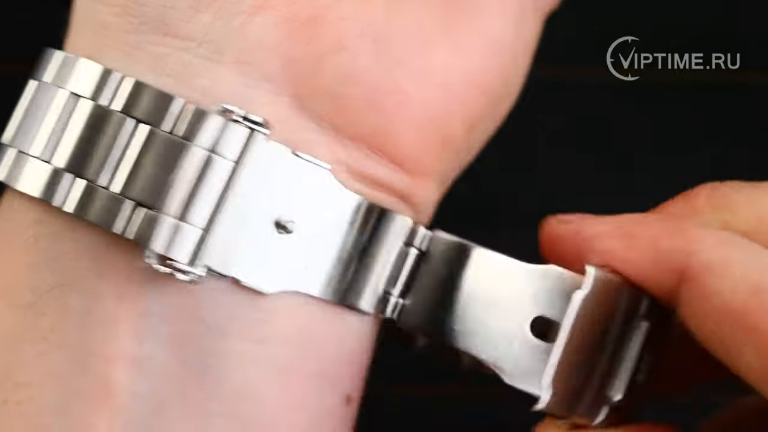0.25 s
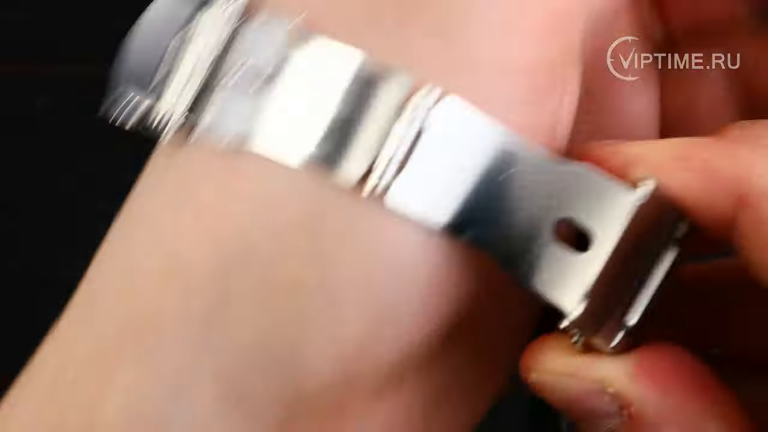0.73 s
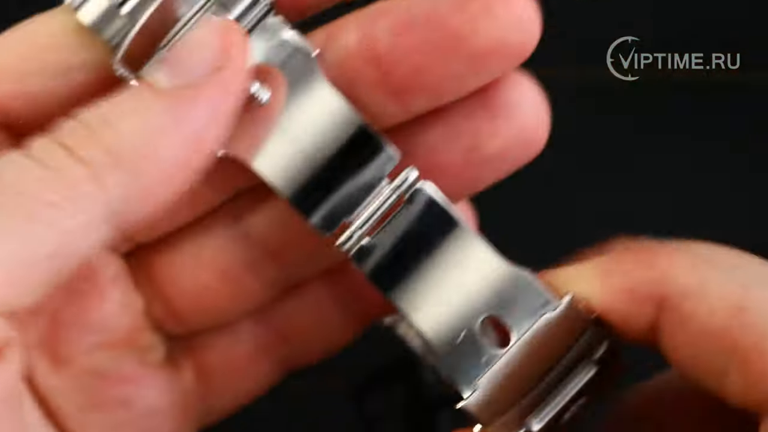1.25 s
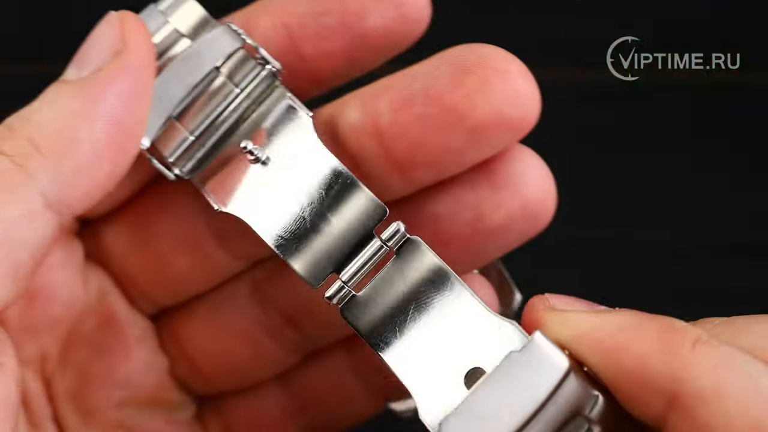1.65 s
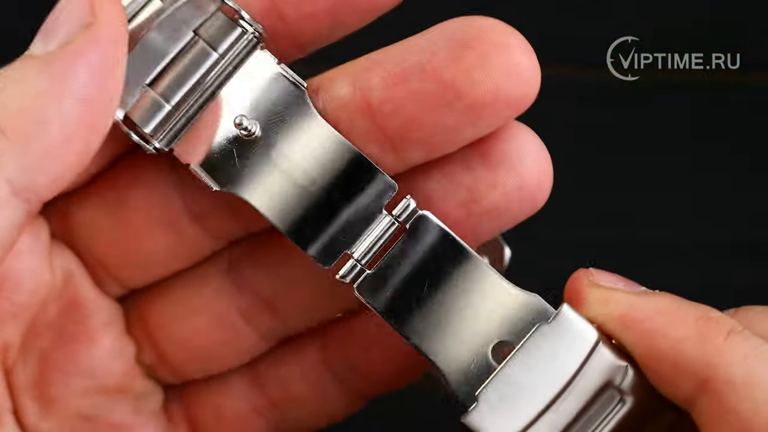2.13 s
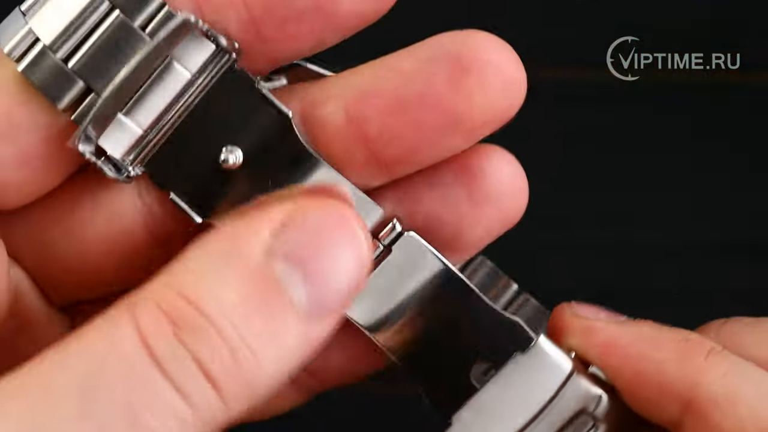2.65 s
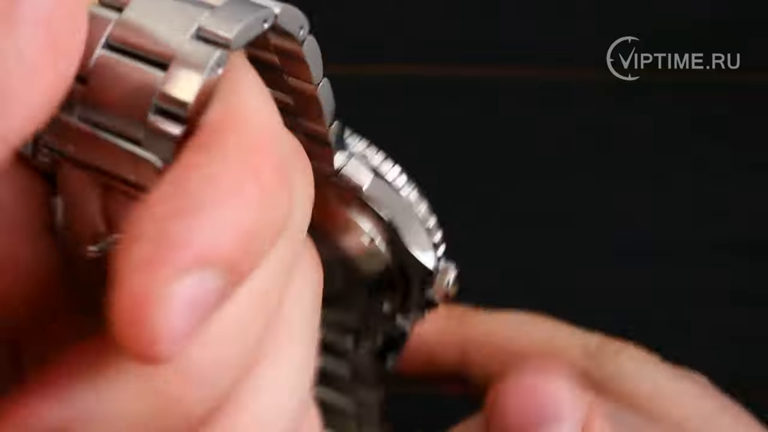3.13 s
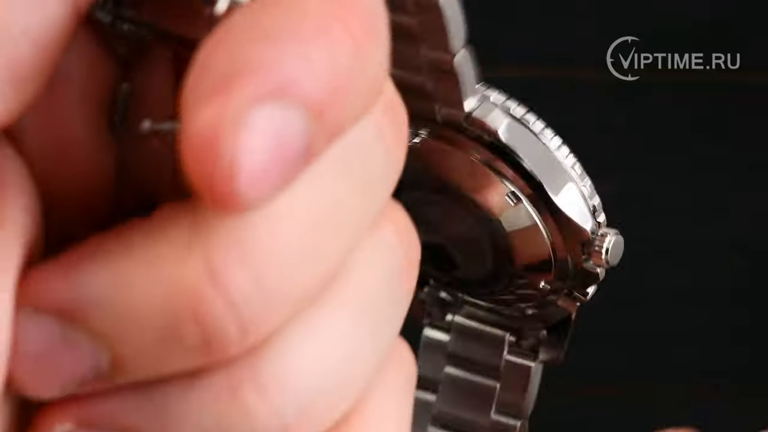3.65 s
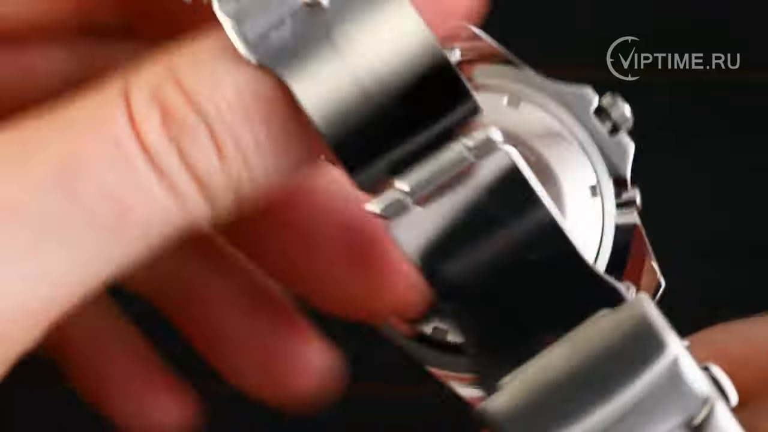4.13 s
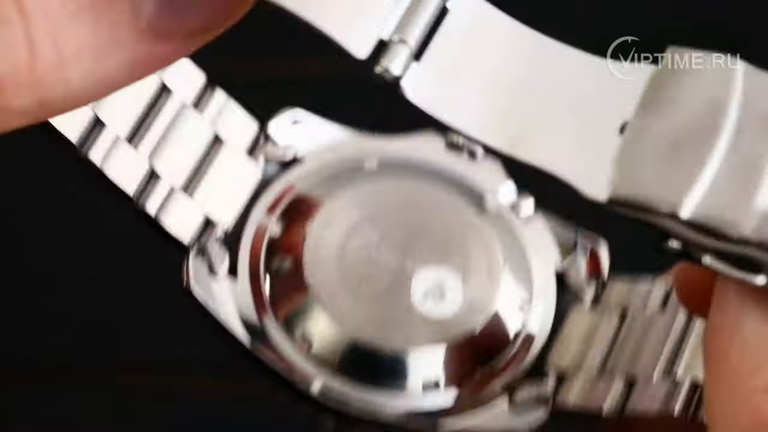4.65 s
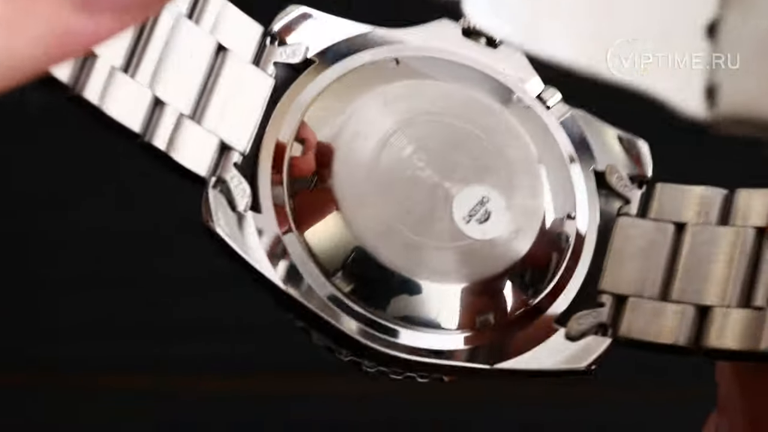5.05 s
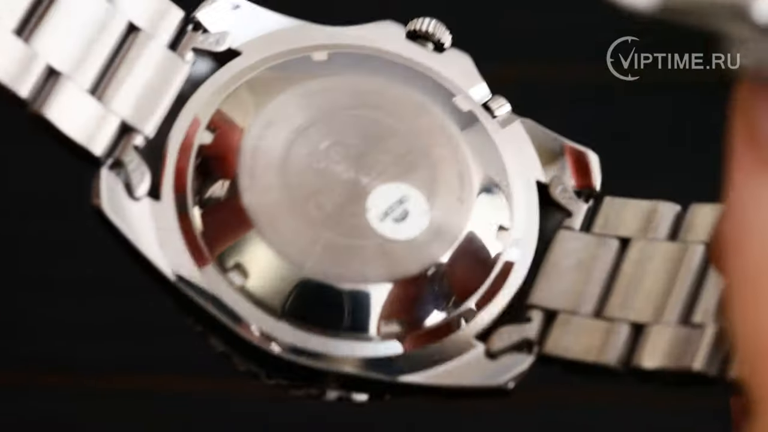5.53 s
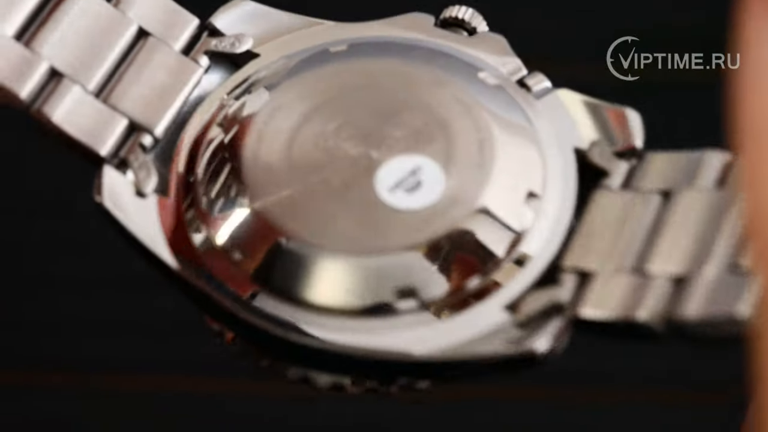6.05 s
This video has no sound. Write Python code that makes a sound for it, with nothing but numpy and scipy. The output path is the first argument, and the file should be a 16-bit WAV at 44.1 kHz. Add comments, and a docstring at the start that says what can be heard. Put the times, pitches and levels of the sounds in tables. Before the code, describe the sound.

A small dry room holds a low, slightly wavering electrical hum and soft fan air; a deep faint rumble swells now and then. Very close, fingers handle a steel watch bracelet. From 0 to 0.7 s there are faint ticks and thin rubbing, clearest near 0.55. Between 0.8 and 1.1 s links slide and clasp blades clack softly, strongest at about 1.04. A single dull click falls at 1.5, then mostly hum until small ticks at 2.4 and 2.75. From 3.0 to 3.7 s light links rub and tick in clumps, with a clack at 3.35. The loudest crisp clinks hit at 4.04 and 4.13, leading into a dense bright rattle until 4.6. A hum tone rises around 4.3. A firm clack at 4.84 and a sharp tick at 5.36 follow, then faint rubbing near 5.8 and hum to 6.3, all rings damped quickly.

```python
"""A small dry room hums with mains-driven appliances; a low rumble comes and goes.
Close to the microphone, fingers open the folding clasp of a steel watch bracelet, slip it off and turn it over.
Links rub, tick and slide, clasp blades clack: short forces ring resonances that the hand damps at once.
Room air is coloured noise, appliances are wavering tones, rubbing is many tiny pings over skin hiss."""
import sys
import numpy as np
from scipy import signal
from scipy.fft import rfft, irfft
from scipy.io import wavfile

SR = 44100
rng = np.random.default_rng(int(sys.argv[2]) if len(sys.argv) > 2 else 0)


def bounce(signal):
    """Save signal as a 16-bit WAV file at the path given by the first command-line argument."""
    frames = np.transpose(np.atleast_2d(signal))
    limited = np.clip(frames, -1, 1)
    pcm = np.round(limited * 32767).astype(np.int16)
    wavfile.write(sys.argv[1], SR, pcm)


N = 277168
TIME = np.arange(N) / SR
SIDES = np.array([[.5], [-.5]])  # left, right


def from_db(db):
    """Decibels to gain."""
    return 10 ** (np.asarray(db) / 20)


def rms_one(x):
    """Scale to rms 1."""
    return x / np.sqrt(np.mean(x ** 2) + 1e-30)


def at_hz(points, hz):
    """Read a spectrum on a log-frequency axis."""
    known_hz, values = np.transpose(points)
    return np.interp(np.log(hz + 1), np.log(known_hz), values)


def coloured(x, spectrum):
    """Give a steady sound a spectrum; rms 1."""
    gain = from_db(at_hz(spectrum, np.fft.rfftfreq(N, 1 / SR)))
    return rms_one(irfft(rfft(x) * gain, N))


def drift(rate_hz):
    """Slow chance with spread 1: noise that falls off above the rate."""
    hz = np.fft.rfftfreq(N, 1 / SR)
    return rms_one(irfft(rfft(rng.standard_normal(N)) / (1 + (hz / rate_hz) ** 2), N))


def resonate(x, hz, width_hz):
    """One two-pole resonance with gain about 1 on top; the wider, the sooner it dies."""
    r = np.exp(-np.pi * width_hz / SR)
    feed = np.array([1, 0, -1]) * (1 - r * r) / 2
    return signal.lfilter(feed, [1, -2 * r * np.cos(2 * np.pi * hz / SR), r * r], x)


def blend(mid, side, alike):
    """Left and right whose likeness is 0 (unrelated) to 1 (the same)."""
    alike = np.clip(alike, 0, 1)
    return np.sqrt(1 + alike) * mid + np.sqrt(1 - alike) * side * [[1], [-1]]


def stereo_noise(alike, size):
    """White noise in two channels that are partly the same."""
    mid, side = rng.standard_normal((2, size))
    return blend(mid, side, alike) / np.sqrt(2)


def swells(rows, attack_s, release_t60_s, rest_db):
    """Gain over time: attack, hold and release of each row over a resting level."""
    gain = from_db(rest_db)
    for start_s, length_s, db in rows:
        attack = np.clip((TIME - start_s) / attack_s, 0, 1)
        release = from_db(-60 * np.clip((TIME - start_s - length_s) / release_t60_s, 0, 2))
        gain = np.maximum(gain, from_db(db) * attack * release)
    return gain


def tone(hz, waver, rate_hz):
    """A tone of rms 1 whose height and phase wander."""
    phase = 2 * np.pi * (hz * TIME + rng.random())
    waver = np.clip(waver, 0, 1)
    in_phase = np.sqrt(2 * (1 - waver ** 2)) + waver * drift(rate_hz)
    quadrature = waver * drift(rate_hz)
    return rms_one(in_phase * np.sin(phase) + quadrature * np.cos(phase))


# Spectrum of room air and fans. Each row: frequency in Hz, relative density in dB per Hz.
AIR_SPECTRUM = [(25, -44), (42, -9), (70, -5), (130, 0.5), (200, 0), (290, 2.5), (390, -5), (700, -8.5),
                (1200, -10.5), (2000, -11.5), (4000, -22), (6600, -29.5), (8500, -31.5), (16000, -33)]
# Left-right likeness of the room air. Each row: frequency in Hz, likeness 0-1.
AIR_LIKENESS = [(100, 0.94), (250, .93), (500, 0.75), (1000, 0.51), (2000, 0.027), (5000, 0.033),
                (16000, 0.064)]
# Resonances that catch fan noise. Each row: frequency in Hz, width in Hz, level in dB rms.
FAN_MODES = [(728, 13, -78), (892, 15, -71), (1170, 66, -69.5), (6380, 110, -82.5), (6830, 490, -81)]
AIR_DB_RMS = -55.5


def air():
    """Fan and room noise, alike at both ports in the bass, with a few faint resonances."""
    mid, side = rfft(rng.standard_normal((2, N)))
    noise = irfft(blend(mid, side, at_hz(AIR_LIKENESS, np.fft.rfftfreq(N, 1 / SR))), N)
    fan = sum(from_db(db) * rms_one(resonate(stereo_noise(.3, N), hz, width_hz))
              for hz, width_hz, db in FAN_MODES)
    return from_db(AIR_DB_RMS) * coloured(noise, AIR_SPECTRUM) + fan


# Steady appliance tones. Each row: frequency in Hz, level in dB rms, waver 0-1.
HUM_TONES = [(100.16, -62.5, 0), (150.2, -53.5, 0.1), (229, -65.5, 0.7), (303.9, -66, 0.46),
             (316.4, -66.5, 0.46), (457, -77.5, 0.64), (489, -78, 0.45), (537, -75.5, 0.65),
             (598.4, -76, 0.5), (1249, -79.5, 0)]


def hum():
    """Mains harmonics and motor tones, each wavering by its own amount."""
    return sum(from_db(db) * tone(hz, waver, rate_hz=5.0) for hz, db, waver in HUM_TONES)


# Course of one motor tone. Each row: time in seconds, level in dB rms.
MOTOR_LEVEL = [(0, -70), (3.6, -71), (4.3, -57), (5, -64), (6.28, -65)]


def motor():
    """A wavering motor tone that swells and partly falls back."""
    gain = from_db(np.interp(TIME, *np.transpose(MOTOR_LEVEL)))
    return gain * tone(hz=109.6, waver=0.26, rate_hz=3.3)


# Swells of low rumble. Each row: start in seconds, length in seconds, level in dB rms.
RUMBLE_SWELLS = [(-0.1, 0.17, -64), (2.38, 0.26, -60.5), (2.74, 0.86, -61.5), (3.5, 0.53, -63.5),
                 (5.45, 0.7, -68.5), (6.15, 0.13, -56)]


def rumble():
    """A wavering deep tone that comes and goes over a resting level."""
    gain = swells(RUMBLE_SWELLS, attack_s=0.085, release_t60_s=0.4, rest_db=-76)
    return gain * tone(hz=44.7, waver=0.27, rate_hz=4)


# The fingers shift the bracelet. Each row: start in seconds, length in seconds, level in dB before the mix.
MOVES = [(0.0, 0.45, -66), (0.37, 0.11, -60.5), (0.53, 0.26, -60.5), (0.68, 0.043, -55),
         (0.83, 0.24, -53.5), (1.08, 0.24, -65), (1.71, 0.047, -63), (2.37, 0.055, -67.5),
         (3.05, 0.33, -62), (3.10, 0.12, -55.5), (3.53, 0.21, -60.5), (3.81, 0.48, -59.5),
         (3.87, 0.046, -52), (4.03, 0.052, -52.5), (4.30, 0.094, -50.5), (4.45, 0.15, -54),
         (4.64, 0.2, -58.5), (4.86, 0.65, -69), (5.32, 0.051, -59.5), (5.72, 0.18, -63.5)]


def motion():
    """Each move swells, holds and dies away; the resting grip still rubs a little."""
    return swells(MOVES, attack_s=0.022, release_t60_s=0.2, rest_db=-79.5)


# Spectrum of the rubbing. Each row: frequency in Hz, relative density in dB per Hz.
RUB_SPECTRUM = [(700, -19), (1500, 0), (2800, 1.5), (4000, -4.5), (5300, -2.5), (7000, -5.5), (9000, -3.5),
                (11000, -5.5), (13500, -2), (16000, -10.5)]
STICK_SLIP_DB, STICK_SLIP_HZ = 2.5, 42


def rubbing(moving, grains_per_s, spread_db, skin_db, grain_t60_s, ping_db, ping_width_hz, count=20, size=500):
    """Tiny slips, each pinging one of many link pieces, over skin hiss; stick and slip clumps them."""
    dying = from_db(-60 * np.arange(size) / SR / grain_t60_s)
    pitches_hz = np.geomspace(3600, 13500, count)
    slips = np.flatnonzero(rng.random(N) < grains_per_s / SR)
    strength = from_db(spread_db * np.minimum(rng.exponential(1, N), 2))
    dealt = rng.integers(0, count * count, N)
    shapes = []
    for k in range(count * count):
        scrape = stereo_noise(0.079, size) * dying
        ping = rms_one(resonate(scrape, pitches_hz[k % count], ping_width_hz))
        shapes.append(rms_one(scrape) + from_db(ping_db) * ping)
    grains = np.zeros((2, N + size))
    for i in slips:
        grains[:, i:i + size] += strength[i] * shapes[dealt[i]]
    skin = from_db(skin_db) * stereo_noise(0.23, N)
    rub = moving * coloured(rms_one(grains[:, :N]) + skin, RUB_SPECTRUM)
    return rub * from_db(STICK_SLIP_DB * drift(STICK_SLIP_HZ))


def steel(force, modes):
    """Each touch meets the modes with strengths of its own, 1 dB spread."""
    return sum(from_db(db + rng.standard_normal()) * resonate(force, hz, width_hz)
               for hz, width_hz, db in modes)


# Low, middle and top band of a contact. Each row: lower edge in Hz, upper edge in Hz.
BANDS = [(900, 4500), (4500, 9000), (9000, 17500)]


def contacts(table, modes, ring_t60_s, scatter_db, crack_db, slide_s, alike, lag_per_db, ring_width_hz,
             soft_hz, size=2200):
    """Steel slides briefly, stops with a snap and chatters out within milliseconds."""
    out, lead = np.zeros((2, N + size)), size // 8
    t = (np.arange(size) - lead) / SR
    filters = [signal.butter(2, band, "band", fs=SR, output="sos") for band in BANDS]
    soften = signal.butter(6, min(soft_hz, .45 * SR), fs=SR, output="sos")
    dying = rms_one((t > 0) * from_db(-60 * np.abs(t) / ring_t60_s)) / np.sqrt(size)
    sliding = rms_one((t < 0) * np.exp(-np.abs(t) / slide_s)) / np.sqrt(size)
    for s, *band_db, slide_db, pan_db, ring_hz, ring_db in table:
        # the snap reaches the nearer port first; lag in samples per dB
        snap = np.sinc(t * SR + pan_db * lag_per_db * SIDES) * (np.abs(t) < .0003)
        chatter = from_db(scatter_db) * dying + from_db(slide_db) * sliding
        force = snap + chatter * stereo_noise(alike, size)
        # modes plus the bare crack
        body = signal.sosfilt(soften, steel(force, modes) + from_db(crack_db) * force)
        # neighbouring bands alternate in sign so that they join without a notch
        click = sum((-1) ** k * from_db(db) * rms_one(signal.sosfilt(filters[k], body))
                    for k, db in enumerate(band_db))
        # the touched piece pings at its own pitch, signed like its band
        ping = resonate(snap + chatter * stereo_noise(alike, size), ring_hz, ring_width_hz)
        sign = (-1) ** sum(ring_hz > high_hz for low_hz, high_hz in BANDS)
        click = click + sign * from_db(ring_db) * rms_one(ping)
        # table levels: rms if all the energy fell within 10 ms
        start = max(round(s * SR) - lead, 0)
        out[:, start:start + size] += click * np.sqrt(SR / 10 ** 2 / size) * from_db(pan_db * SIDES)
    return out[:, :N]


LOOSE_PER_S = 42  # at full motion
LOOSE_DB, LOOSE_SPREAD_DB = 4, 0.5  # over the motion level
LOOSE_TOP_DB, LOOSE_SLIDE_DB, LOOSE_PAN_DB, LOOSE_RING_DB = 9, -14, -1.5, 0
LOOSE_RING_HZ = (3860, 13200)


def loose_ticks(moving, count=200):
    """Random faint ticks, denser and stronger the more the bracelet moves; rows as in LINK_TICKS."""
    wait, pitch = rng.random((2, count))
    strength = rng.standard_normal(count)
    due = np.cumsum(LOOSE_PER_S * moving / moving.max()) / SR
    starts = np.searchsorted(due, np.cumsum(2 * wait))
    low_hz, high_hz = LOOSE_RING_HZ
    rows = []
    for i, a, p in zip(starts, strength, pitch):
        if i < N:
            db = 20 * np.log10(moving[i]) + LOOSE_DB + LOOSE_SPREAD_DB * a
            ring_hz = low_hz * (high_hz / low_hz) ** p
            rows.append((i / SR, db, LOOSE_TOP_DB, LOOSE_SLIDE_DB, LOOSE_PAN_DB, ring_hz, LOOSE_RING_DB))
    return rows


LINK_LOW_DB = -14.5  # links are light: low band under the tick


def link_contacts(ticks):
    """Share each tick's strength among the three bands and its own ring; rows as in CLASP_KNOCKS."""
    rows = []
    for s, db, top_db, slide_db, pan_db, ring_hz, ring_db in ticks:
        middle_db = db - 10 * np.log10(1 + from_db(top_db) ** 2)
        band_db = (db + LINK_LOW_DB, middle_db, middle_db + top_db)
        rows.append((s, *band_db, slide_db, pan_db, ring_hz, db + ring_db))
    return rows


# Clear ticks of the links. Each row: time in seconds, level in dB before the mix, top over middle band in dB,
# slide before the stop in dB, left over right in dB, own ring in Hz, own ring over the tick in dB.
LINK_TICKS = [(0.1288, -55.5, -6, -18, -1.5, 6360, -7), (0.1884, -48, 9, -23, 1, 6400, -10),
              (0.3833, -51.5, 17, -28, 1, 9440, 0.5), (0.558, -43.5, 6, -15, 0.5, 7350, -1),
              (0.5707, -45.5, 3, -11, -0.5, 14020, -6), (0.831, -47, 14, -19, 0, 12970, -15),
              (0.8518, -45.5, 8, -8, -2, 9100, -5), (0.8639, -48, 13, -2, -5, 14460, -12),
              (0.9488, -50, 18, -9, 3.5, 11300, -3), (1.0088, -49, 12, -22, -1.5, 14120, -1),
              (1.2328, -53, -2, -13, 0, 13620, -6), (1.4042, -54.5, 5, -8, 1, 12910, -10),
              (2.4018, -48.5, 9, -25, 4.5, 7440, 0), (2.4285, -47.5, 14, -23, 0.5, 7370, 5.5),
              (2.9746, -52.5, -7, -4, -0.5, 7210, -12), (3.0061, -52, -1, -3, -2, 9400, -10),
              (3.0952, -45.5, -2, -5, -1, 12030, -8), (3.1438, -53, 0, -3, -1.5, 5890, 4),
              (3.1562, -50, 2, 9, 2, 6005, 2.5), (3.1994, -51, -2, 2, 2, 4390, 1.5),
              (3.2197, -48.5, -7, -10, -1, 4010, -0.5), (3.2306, -47.5, 0, -20, 2, 9500, 2),
              (3.6271, -49, 9, -12, -1.5, 13340, -8), (3.6474, -49, 10, 1, -1.5, 6040, -5),
              (3.6786, -44.5, 3, -5, 3, 6970, -3), (3.8586, -46.5, 19, -22, 2.5, 5100, 6),
              (3.8919, -52.5, 0, -22, 1, 5790, 7.5), (3.9117, -49, -4, -12, 0.5, 9250, -17),
              (3.9629, -47.5, -6, -24, 1, 9260, -4), (4.0361, -33.5, 5, -18, 0.5, 7500, -5),
              (4.1288, -50, 1, -18, -1, 7080, -1), (4.1305, -31, -18, -15, 0.5, 7250, -5),
              (4.1765, -41, 5, -10, -1, 5240, 1.5), (4.2477, -50, -4, 3, -1.5, 4696, -4),
              (4.2975, -49.5, 0, 1, 1.5, 4840, -3), (4.3499, -42, 8, -5, 2, 11660, -13),
              (4.3583, -36, 6, 3, -0.5, 9700, -9), (4.3854, -41.5, 4, -14, 1, 8650, -1),
              (4.4068, -43.5, 0, -12, 0.5, 7840, -8), (4.4523, -48, -4, -6, 1, 13140, 0),
              (4.4629, -44.5, 3, 1, -2, 3518, -2), (4.488, -43, -5, 6, -2.5, 10720, -11),
              (4.5013, -43.5, 0, -16, 2, 10880, 2), (4.5471, -40.5, 3.5, -1, 6.5, 13550, 0),
              (4.5688, -43.5, 7, -16, 0, 8380, -4), (4.5914, -47, -5, -12, 1, 10500, -2),
              (4.6945, -55, 8, -5, -3.5, 10500, -5), (4.7154, -48.5, 5, -1, -2.5, 10750, -7),
              (4.7965, -52, 2, 3, -2, 12370, 1), (5.2405, -55.5, -8, -11, -3.5, 13330, -4),
              (5.3469, -46.5, 8, -18, -3, 7080, -1), (5.363, -38.5, 15, -22, -2.5, 10170, -2),
              (5.7713, -55, 0, -5, -2.5, 13250, -10)]
# Hand-damped link resonances. Each row: frequency in Hz, width in Hz, relative level in dB.
LINK_MODES = [(1500, 700, -14), (2930, 510, -1), (4440, 760, -11), (4740, 810, 2), (5450, 350, 0.5),
              (6050, 600, 4.5), (7060, 740, 8), (8120, 300, 2.5), (9400, 1900, 3.5), (11100, 2600, 4.5),
              (13400, 2700, 14), (15700, 800, -22)]


def links(moving):
    """Light links strike each other: clear ticks plus faint loose ones."""
    ticks = link_contacts(LINK_TICKS + loose_ticks(moving))
    return contacts(ticks, LINK_MODES, ring_t60_s=0.033, scatter_db=-0.5, crack_db=-5, slide_s=0.0018,
                    alike=0.34, lag_per_db=1.14, ring_width_hz=310, soft_hz=17900)


# Knocks of the clasp blades. Each row: time in seconds, low, middle and top band in dB before the mix,
# slide before the stop in dB, left over right in dB, own ring in Hz, own ring in dB before the mix.
CLASP_KNOCKS = [(0.2632, -55.5, -69, -77, -1, 2.5, 2740, -60),
                (0.9199, -47.5, -56, -46.5, 6, 0, 14450, -44),
                (0.9741, -45.5, -50, -51, -3, -1.5, 2160, -50),
                (1.0385, -38, -42, -55, -10, -1.5, 3780, -37), (1.0566, -55, -58, -69, 3, -5, 2570, -61),
                (1.4801, -39, -44, -43, -44, -1, 6450, -52), (2.7503, -54.5, -50, -56, -30, 0.5, 6600, -52),
                (3.349, -40.5, -47, -40.5, -11, -0.5, 5200, -46.5),
                (4.743, -66, -65, -66, -9, -5, 1385, -52), (4.8351, -36, -45, -39, -33, -2.5, 3100, -47)]
# Hand-damped clasp resonances. Each row: frequency in Hz, width in Hz, relative level in dB.
CLASP_MODES = [(980, 130, 0), (1790, 72, 5), (2380, 110, 10), (2560, 350, 6), (3160, 420, 9),
               (3990, 680, 7.5), (4760, 360, -6), (5680, 1200, 5.5), (6680, 330, -1), (7630, 700, 7),
               (9300, 1300, 5.5), (10450, 350, -16), (11050, 1300, 5.5), (13300, 300, 4)]


def clasp():
    """Clasp blades knock and ring their damped modes."""
    return contacts(CLASP_KNOCKS, CLASP_MODES, ring_t60_s=0.016, scatter_db=5.0, crack_db=-17, slide_s=0.0029,
                    alike=0.34, lag_per_db=3.0, ring_width_hz=270, soft_hz=14500)


ROOM_T60_S = 0.091


def room(x, tail_db, echo_db, far_echo_db, size=14000):
    """A faint short tail and two smeared wall echoes."""
    t = np.arange(size) / SR
    response = from_db(tail_db) * rms_one((t > .004) * from_db(-60 * t / ROOM_T60_S))
    for delay_s, db in ((.028, echo_db), (.078, far_echo_db)):
        echo = (t > delay_s) * np.exp(-np.abs(t - delay_s) / 0.00073)
        response = response + from_db(db) * rms_one(echo)
    response = response * stereo_noise(0.11, size) / np.sqrt(size)
    return signal.oaconvolve(x, response, axes=1)[:, :N]


def scene():
    """The bracelet close by, the humming room behind it."""
    background = (air() + (hum() + motor() + rumble())) * from_db([[-.4], [.4]])
    moving = motion()
    watch = from_db(-2.0) * clasp() + from_db(-3.5) * links(moving)
    rub = rubbing(moving, grains_per_s=290, spread_db=1.5, skin_db=-5.5, grain_t60_s=0.021,
                  ping_db=-3, ping_width_hz=220)
    watch = watch + from_db(-2.5) * rub
    return watch + room(watch, tail_db=-20.5, echo_db=-29.0, far_echo_db=-30) + background


CUTOFF_HZ = 16000


def record(dry):
    """The top is cut steeply."""
    return signal.sosfilt(signal.ellip(10, .1, 70, CUTOFF_HZ, fs=SR, output="sos"), dry)


dry = scene()
out = record(dry)
bounce(out)
```